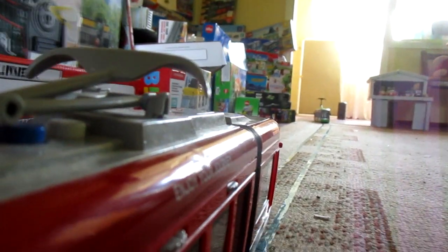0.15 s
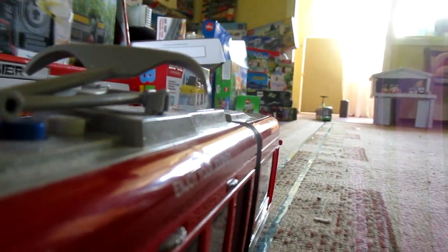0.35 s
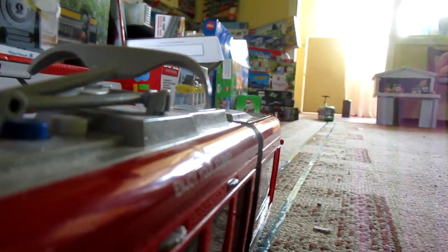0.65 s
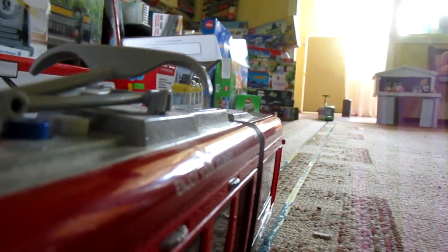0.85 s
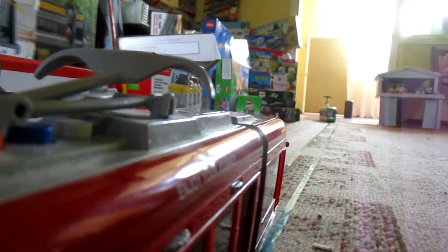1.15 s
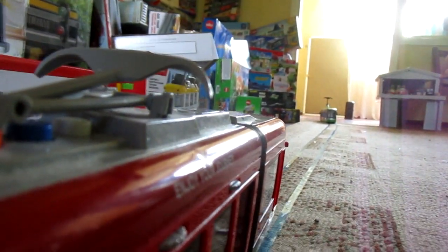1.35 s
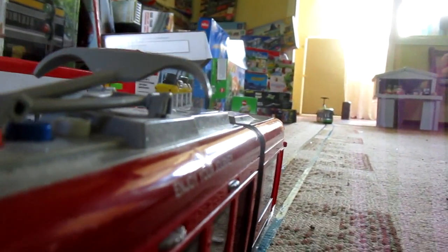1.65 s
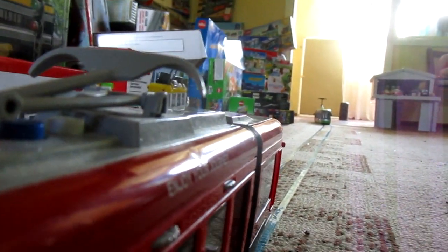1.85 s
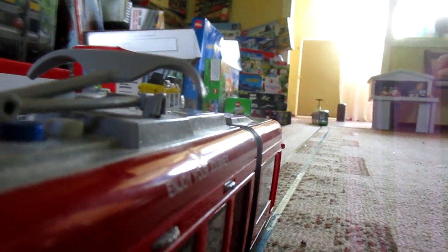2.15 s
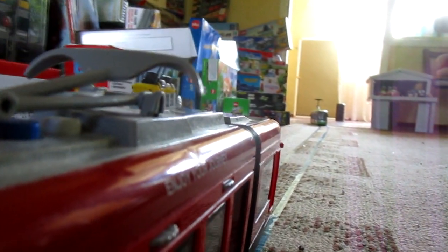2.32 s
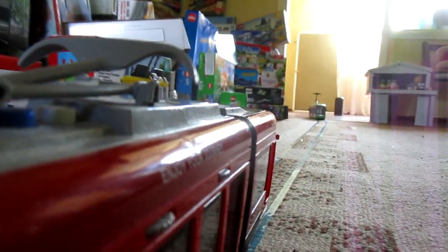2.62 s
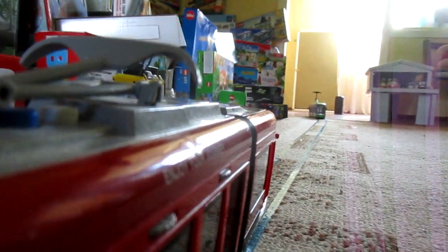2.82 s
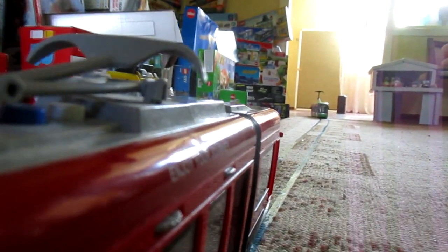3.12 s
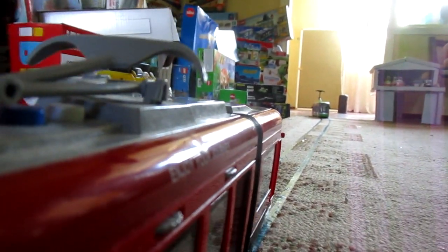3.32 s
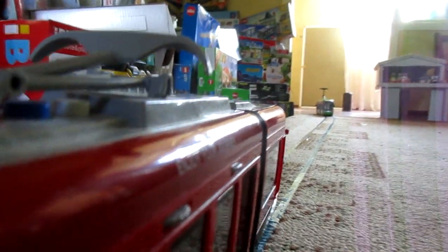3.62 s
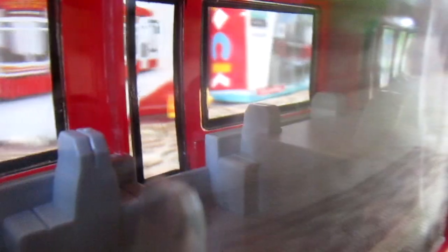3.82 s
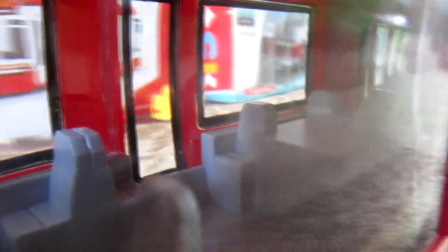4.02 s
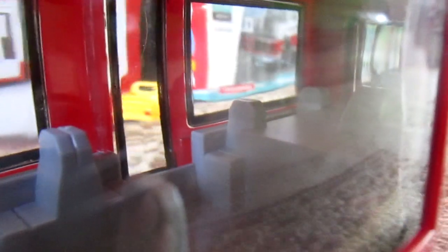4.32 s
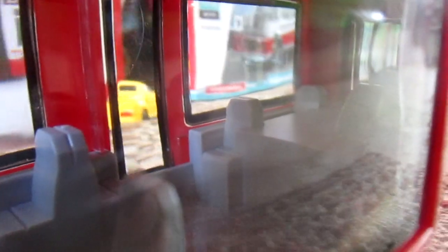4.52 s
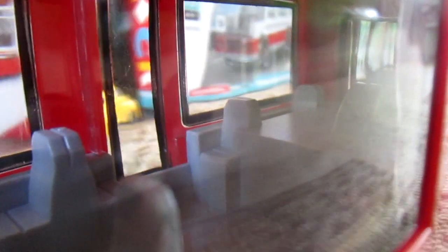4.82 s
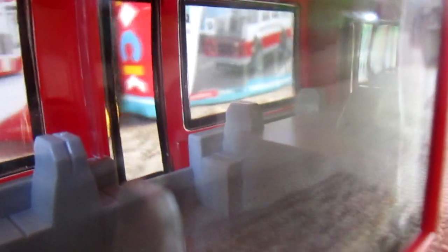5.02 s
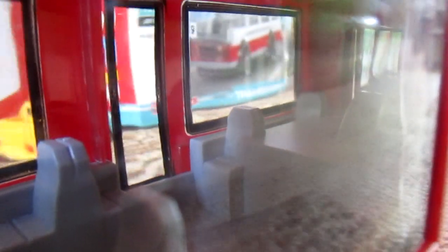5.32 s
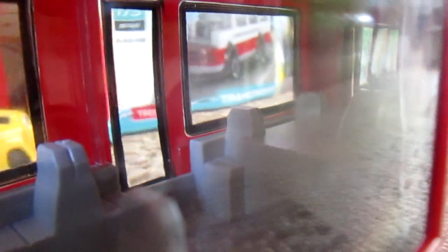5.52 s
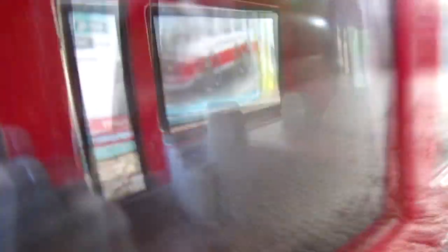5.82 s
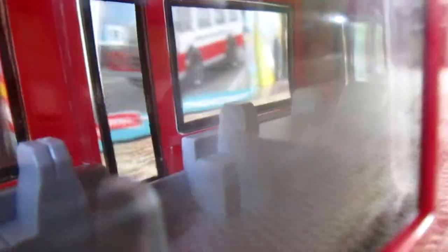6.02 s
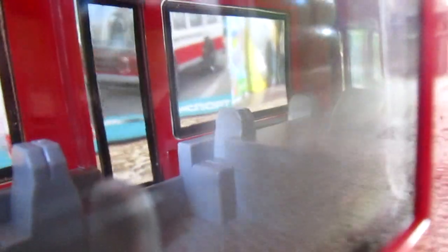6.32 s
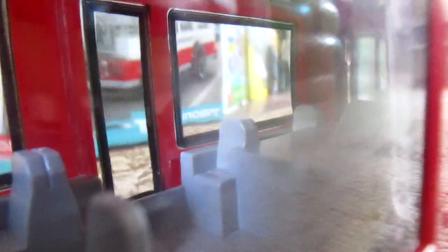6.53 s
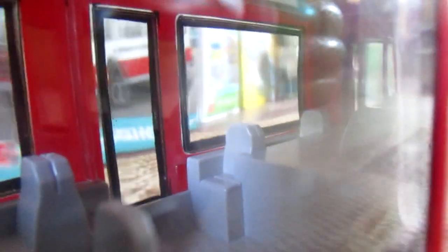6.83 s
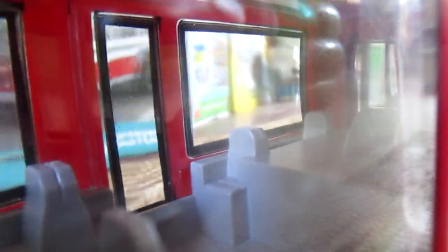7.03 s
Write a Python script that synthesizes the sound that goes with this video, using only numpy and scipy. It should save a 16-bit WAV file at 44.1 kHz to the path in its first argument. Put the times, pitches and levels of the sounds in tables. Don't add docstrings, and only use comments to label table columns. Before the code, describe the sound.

Close, dry mono sound from a microphone riding on a hollow plastic toy tram on carpet in a room. From 0 s, fast gear-tooth ticks, about a hundred a second, form a rough buzzing whirr with hissy scraping above and gritty wheel rumble beneath. Hollow knocks cluster before 0.5 s and around 1.3-1.5 s. The speed wavers, then falls after 2.6 s to a slow ratchet, with strong clacks at 2.8 and 3.4 s. At 3.57 s it cuts to complete silence. At 3.93 s a louder, brighter ride starts abruptly with jolts and ticks up to 4.1 s. From 4.45 s it accelerates, the whine climbing. Sharp clicks come at 4.97 and 5.57 s, then a huge clipping thump at 5.73 s briefly dips the rolling. Another heavy bump follows at 5.93 s, a knock and scraping drag near 6.3 s, and scattered ticks over the fastest whirr until 7.16 s.

```python
import sys
import numpy as np
from scipy import signal
from scipy.fft import rfft, irfft, next_fast_len
from scipy.io import wavfile
from scipy.ndimage import uniform_filter1d

SR = 44100
rng = np.random.default_rng(int(sys.argv[2]) if len(sys.argv) > 2 else 0)


def put_to_file(sound):
    columns = np.atleast_2d(sound).T
    safe = np.clip(columns, -1, 1)
    whole_steps = np.round(safe * 32767)
    wavfile.write(sys.argv[1], SR, whole_steps.astype(np.int16))


def linear_from_db(decibels):
    return 10 ** (np.asarray(decibels, float) / 20)


N = 315752

# (start [s], end [s])
SPANS = [
    (0, 3.5705),
    (3.928, 7.16),
]
# (tooth rate [teeth/s], floor rumble [dB], body [dB], gear [dB])
CRUISE = [
    (105.5, -47, -43.5, -50),
    (199, -47, -40.5, -43.5),
]
# (centre [Hz], width [Hz], lift [dB])
CASE_MODES = [
    [(4430, 120, 4), (5400, 60, 3), (5830, 120, 2), (6260, 270, 6.5), (7450, 130, 2.5), (7930, 150, 7.5),
     (8550, 320, 5.5), (9370, 180, 3.5), (10200, 180, 1.5), (10700, 190, 6.5), (12200, 300, 2.5),
     (13500, 500, 4), (14050, 300, 1.5), (14750, 300, 1.2)],
    [(3550, 200, 8), (3800, 250, 7.5), (5700, 220, 4.5), (6053, 222, 8.5), (7000, 120, 5), (7380, 200, 5.5),
     (7880, 105, 7), (8250, 156, 6), (8630, 210, 6), (9430, 220, 6), (10370, 130, 7.5), (10760, 240, 5.5),
     (13750, 500, 3), (15440, 1100, 13.5)],
]


def level(x, db):
    return x * linear_from_db(db) / np.sqrt(np.mean(x ** 2))


def ring(n, hz, width_hz):
    f = np.fft.rfftfreq(n, 1 / SR)
    return 1j * f * width_hz / (hz ** 2 - f ** 2 + 1j * f * width_hz)


def lifts(n, modes):
    return np.prod([1 + (linear_from_db(db) - 1) * ring(n, hz, width) for hz, width, db in modes], axis=0)


def spectrum(n, points):
    hz, db = np.transpose(points)
    return linear_from_db(np.interp(np.log(np.fft.rfftfreq(n, 1 / SR) + 1), np.log(hz), db))


def walk(n, rate):
    hold = int(SR / rate)
    steps = np.repeat(rng.standard_normal(n // hold + 1), hold)
    return 1.09 * uniform_filter1d(steps, hold)[:n]


def add(out, s, x):
    i = int(s * SR)
    out[i:i + len(x)] += x[:len(out) - i]


def teeth(hz, first):
    phase = np.cumsum(hz) / SR - first
    tooth = np.floor(phase).astype(int)
    since = (phase - tooth) / hz
    hit = np.flatnonzero(np.diff(tooth)[:-64]) + 1
    at = hit - since[hit] * SR + 30 + .00003 * SR * rng.standard_normal(len(hit))
    click, whole = np.zeros(len(hz)), at.astype(int)
    click[whole] = 1 - (at - whole)
    click[whole + 1] = at - whole
    return tooth, since, click


def gearbox(k, tooth, since, click, top_db, strength, speed_db):
    panel_hz = [3650, 4400, 5500, 6200, 7250, 8000, 8600, 9550, 10600, 13300, 15000]
    tooth_db = [
        [(-7, -7, -2, 0, -3, -2, -4, -5), (0, -12, -12, -12, -12, -1, 0, 0), (-5, -6, 0, -1, -5, -2, -6, -6),
         (-8, -3, 0, 0, -1, -4, -8, -8), (-6, 0, -8, -7, -3, -4, -8, -8), (-6, -1, -6, -4, -1, 0, -6, -6),
         (-5, 0, -4, -2, 0, -1, -5, -5), (-3, -1, -2, -1, 0, -1, -2, -2), (-4, -2, -2, 0, 0, -1, -1, -2),
         (-6, -5, 0, -1, -3, -3, -7, -6), (-5, -4, -1, 0, -1, -3, -4, -4)],
        [(-5, -6, -6, -5, -2, 0, 0, -3), (0, 0, 0, -3, -4, -4, -4, -4), (-2, -2, -2, 0, -1, 0, -1, -1),
         (-1, -1, -1, 0, -1, -2, -2, -1), (-9, -11, -10, -3, -6, -9, 0, -4), (0, -2, -4, -2, -3, -8, -6, 0),
         (0, -1, -2, -2, -6, -9, -6, 0), (0, -1, -3, -1, 0, 0, -1, -1), (-2, 0, 0, -2, -2, -2, -2, -1),
         (0, -4, -4, -2, -1, 0, -1, -2), (-4, -4, -4, -2, 0, 0, 0, -3)],
    ][k]
    panel_law = [(-.2, .1, .3, .3, .1, 0.36, .3, .2, .1, -.05, -.05),
                 (.3, .1, -0.52, -0.75, -0.15, 0.51, 0.46, .2, .05, .4, .1)][k]
    panel_bend = [(.01, .01, 0.043, 0.015, 0.019, .01, .01, .01, .01, 0.0091, .01),
                  (.05, .01, -.2, -0.16, -0.14, 0.13, 0.17, .05, 0.054, .05, .05)][k]
    # (scrape rise and decay [s], steady rub [dB], scatter between teeth [dB])
    decay, rub_db, scatter_db = [(.0014, -11.5, 1.0), (.0007, -10, 1.5)][k]
    # (frequency [Hz], level [dB per Hz])
    case_colour = [
        [(2600, -39), (3200, -9), (4400, -8), (6500, -6), (8500, -7), (11000, -11), (13000, -18),
         (15800, -19.5)],
        [(2600, -45), (3200, -20.5), (4400, -11.5), (6500, -5.5), (8500, -4), (11000, -11), (12500, -13),
         (15800, -29.5)],
    ][k]
    edge_db = (21, 20)[k]
    runout = 1.8

    n, out = len(tooth), 0
    log_f = np.log(np.fft.rfftfreq(n, 1 / SR) + 1)
    resonance = lifts(n, CASE_MODES[k])
    colour = spectrum(n, case_colour) * resonance
    sharper = resonance ** 1.6
    sharper = sharper / np.sqrt(np.mean(np.abs(sharper) ** 2))
    scrape = since / decay * np.exp(1 - since / decay)
    wake_db = np.outer(panel_law, speed_db) + np.outer(panel_bend, speed_db ** 2)
    for p, row in enumerate(tooth_db):
        scatter = scatter_db * rng.standard_normal(tooth[-1] + 2)[tooth + 1]
        size = strength * linear_from_db(runout * np.array(row)[tooth % 8] + scatter)
        rub = rng.standard_normal(n) * (linear_from_db(rub_db) * (.6 + .4 * size) + .6 * size * scrape)
        push = rfft(rub) + linear_from_db(edge_db) * rfft(size * click) * sharper
        push = push / np.sqrt(np.mean(np.abs(push) ** 2))
        near = np.interp(log_f, np.log(panel_hz), np.arange(len(tooth_db)) == p)
        share = np.sqrt(np.clip(3 * near - 1, 0, 1))
        panel = irfft(push * colour * share, n)
        panel = panel * linear_from_db(wake_db[p] + 1.1 * walk(n, 2.5))
        if panel_hz[p] > 12000:
            panel = panel * linear_from_db(top_db - np.mean(top_db))
        out = out + panel
    return level(out, 0)


def regrip(gear, k, t):
    # (centre [Hz], width [Hz], lift [dB])
    late_modes = [
        [(4500, 130, 2.5), (5350, 60, 3), (5750, 130, 2), (6170, 160, 5.5), (7440, 180, 3.5), (7750, 180, 2.5),
         (8360, 350, 6.5), (9370, 130, 5.5), (9970, 130, 3.5), (10900, 900, 3), (12300, 400, 4),
         (12900, 180, 2), (14170, 300, 3), (15600, 300, 1)],
        [(3480, 170, 10.5), (3750, 260, 8), (5700, 250, 5), (6190, 350, 6.5), (6800, 100, 5), (7390, 110, 6),
         (7800, 110, 7.5), (8220, 66, 8), (8530, 55, 6), (8730, 110, 7.5), (9400, 150, 7.5), (10450, 100, 8),
         (10900, 300, 5.5), (15250, 1200, 13.5)],
    ][k]
    # (from [s], to [s])
    shift_s = [(1.2, 2), (5.7, 6.6)][k]
    n = len(gear)
    change = (lifts(n, late_modes) / lifts(n, CASE_MODES[k])) ** 1.3
    late = np.interp(t, shift_s, [0, 1])
    return gear * (1 - late) + irfft(rfft(gear) * change, n) * late


def gear_whine(k, click, hz):
    n, whine_hz, width_hz = len(hz), 2350, 600
    body = ring(n, whine_hz, width_hz) ** 2 - .5 * ring(n, 1.6 * whine_hz, width_hz) ** 2
    whine = irfft(rfft(click * (hz / 200) ** 1.9) * body, n)
    return level(whine, (-26, -8.5)[k])


def gear_tones(turns, hz):
    multiples = [2, 2.5, 2.625, 3, 5, 6, 7, 8, 10, 12, 14, 15]
    tone_db = [-21, -22, -24, -27, -30, -22, -26, -28, -19, -36, -29, -26]
    tones = 0
    for multiple, db in zip(multiples, tone_db):
        wobble_db = 3.5 * walk(len(hz), 9)
        tones = tones + linear_from_db(db + wobble_db) * np.sin(2 * np.pi * multiple * turns)
    return tones * (hz / CRUISE[1][0]) ** 6.3


def shell_rings(k, tooth, speed_db):
    # (centre [Hz], width [Hz], level [dB re body], gain [dB per dB of speed])
    side_panels = [
        [(2617, 140, -12.5, 1.6), (1330, 110, -20, -0.5), (2370, 90, -12, .6), (2545, 30, -23.5, 1.1)],
        [(568, 45, -8.5, 0.8), (1470, 100, -20, 0.5), (2488, 130, -18, -2)],
    ][k]
    shake_db = [
        [(-6, -1, -8, -8, 0, -7, -10, -8), (0,) * 8, (-2, -8, -4, -4, -9, -7, -2, 0), (0,) * 8],
        [(0,) * 8] * 3,
    ][k]
    n, out = len(tooth), 0
    shake = rng.standard_normal(n)
    for (hz, width, db, law), row in zip(side_panels, shake_db):
        shaken = rfft(shake * linear_from_db(np.array(row)[tooth % 8]))
        panel = irfft(shaken * ring(n, hz, width) ** 2, n)
        out = out + level(panel, db) * linear_from_db(law * speed_db + 1.2 * walk(n, 9.7))
    return out


def wheels(k, n, rumble_db, body_db, speed_db):
    # (frequency [Hz], level [dB per Hz])
    body_colour = [
        [(15, -37.5), (25, -8), (79, -1), (226, -11.5), (294, -7.5), (566, -5), (736, -9.5), (839, -6.5),
         (1020, -11.5), (1390, -5.5), (1650, -11), (2440, -10.5), (2910, -23.5), (3860, -24.5), (4600, -24.5),
         (5980, -55.5), (10100, -120)],
        [(15, -36), (25, -2.5), (143, -2), (343, -7.5), (436, -9), (579, -4), (769, -16.5), (857, -12.5),
         (1240, -12.5), (1450, -5.5), (1720, -15.5), (2500, -15.5), (2970, -25), (3780, -22.5), (4600, -25),
         (5980, -34), (10100, -120)],
    ][k]
    # (centre [Hz], width [Hz], lift [dB])
    body_modes = [(610, 73, 2), (1460, 76, 1), (2370, 83, 2.5), (2630, 160, 6)]
    tilt_db = [0.14, 0.033][k] * speed_db
    f = np.fft.rfftfreq(n, 1 / SR) + 1
    colour = spectrum(n, body_colour) * lifts(n, body_modes)
    bumps = linear_from_db(1.5 * walk(n, 120) + 0.82 * walk(n, 12))
    rumble, body = 0, 0
    for hz in 25 * 2 ** np.arange(0, 7.8, .5):
        share = np.cos(np.pi * np.clip(np.log2(f / hz), -.5, .5))
        band = irfft(rfft(rng.standard_normal(n) * bumps) * colour * share, n)
        flicker_db = 1.5 * walk(n, 6 + hz / 60)
        band = band * linear_from_db(flicker_db + tilt_db * max(np.log2(hz / 586), 0))
        if hz > 350:
            body = body + band
        else:
            rumble = rumble + band
    return level(rumble, 0) * linear_from_db(rumble_db) + level(body, 0) * linear_from_db(body_db)


def loudness(k, t, hz):
    # (rumble, body, gear, top panels [dB per dB of speed])
    speed_law = [(0.198, .6, 0.21, -.55), (.3, 0.907, 0.87, -0.048)][k]
    # (time [s], level [dB])
    hand_press = [
        [(0, -1.5), (.1, .4), (.2, -0.5), (.45, 0), (1.1, 0), (1.4, 0), (1.8, 1.5), (2.55, 0.5), (2.9, -.5),
         (3.57, 2.5)],
        [(3.93, -1.5), (4.05, 0.5), (4.35, -2), (5, 1.5), (5.3, 0.5), (5.7, 1.5), (6.1, -1), (6.4, 0.5),
         (7.16, 1.5)],
    ][k]
    press_share = (0.95, 0.55, 0.77, -.8)
    cruise_hz, *cruise_db = CRUISE[k]
    speed_db = 20 * np.log10(hz / cruise_hz)
    press_db = np.interp(t, *np.transpose(hand_press))
    after = np.maximum(t - 5.74, 0)
    duck_db = -10.5 * (1 - np.exp(-after / 0.034)) * np.exp(-after / 0.11)
    *moves, top = [law * speed_db + share * press_db for law, share in zip(speed_law, press_share)]
    return [db + move + duck_db for db, move in zip(cruise_db, moves)] + [top]


def ride(k):
    # (time [s], tooth rate [teeth/s])
    speed_roof = [(0.0, 116.2), (0.93, 97.9), (1.393, 110.9), (1.903, 91.8), (2.61, 91.9), (3.255, 49.3),
                  (3.57, 41.6)]
    # (time [s], tooth rate [teeth/s])
    speed_side = [(3.93, 128.2), (4.448, 126.1), (5.099, 181.9), (5.299, 191.3), (5.793, 191.4),
                  (6.337, 223.0), (6.39, 231.9), (6.601, 228.8), (6.706, 242.1), (6.84, 246.8),
                  (7.16, 245.8)]
    first_tooth = [-.04, .81][k]
    start, end = SPANS[k]
    n = next_fast_len(min(N, int(end * SR)) - int(start * SR))
    t = int(start * SR) / SR + np.arange(n) / SR
    hz = np.interp(t, *np.transpose((speed_roof, speed_side)[k]))
    speed_db = 20 * np.log10(hz / CRUISE[k][0])
    rumble_db, body_db, gear_db, top_db = loudness(k, t, hz)

    tooth, since, click = teeth(hz, first_tooth)
    strength = np.minimum(hz / 90, 1)
    gear = regrip(gearbox(k, tooth, since, click, top_db, strength, speed_db), k, t)
    singing = gear_whine(k, click, hz) + gear_tones(tooth + since * hz, hz)
    singing = singing + shell_rings(k, tooth, speed_db)
    sound = gear * linear_from_db(gear_db) + singing * linear_from_db(body_db)
    sound = sound + wheels(k, n, rumble_db, body_db, speed_db)
    return sound * np.clip((end - t) / 0.0016, 0, 1) * np.clip((t - t[0]) / 0.00087, 0, 1)


def clack(db, hz, t60, spread, rough, wide):
    t = np.arange(2048) / SR
    chance, crackle = rng.random((2, 5)), rng.standard_normal(2048)
    fall = np.exp(-np.log(1000) * t / max(t60, .003)) * (1 - np.exp(-t * hz * 1.6))
    pitches = hz * np.exp(spread * (chance[0] - .5) * [0.088, 2.2, 1.4, 1.7, 1.1])
    strengths = chance[1] - [-1.08, 0.58, 1.0, 0.663, 0.48]
    tones = np.sum(np.sin(2 * np.pi * pitches[:, None] * t) * strengths[:, None], axis=0)
    burst = irfft(rfft(crackle * fall ** 2) * ring(2048, hz, wide * hz) ** 3)
    x = tones * fall + rough * burst / np.max(np.abs(burst))
    return linear_from_db(db) * x / np.max(np.abs(x))


def knocks(out):
    # (time [s], upper ring [Hz], upper level [dB], hollow level [dB])
    knocks_roof = [(.133, 2090, -26, -38), (.153, 2000, -45, -26), (.2385, 2100, -32.5, -44),
                   (.239, 1400, -31, -50), (.276, 1400, -36, -50), (.358, 1220, -28, -31),
                   (.407, 1510, -34, -41), (.444, 1260, -33, -38), (.493, 1500, -32, -38),
                   (.96, 1280, -34, -56), (1.297, 1330, -31, -38.5), (1.393, 1380, -28, -51),
                   (1.405, 2440, -33, -34), (1.417, 1310, -33, -44), (1.473, 1350, -37, -54),
                   (1.816, 1184, -28, -32), (1.965, 1380, -30.5, -32.5), (2.03, 1290, -38, -37.5),
                   (2.224, 2030, -36, -34.5), (2.501, 1370, -32, -37), (2.537, 1153, -29, -32.5),
                   (2.8106, 1256, -15.5, -23.5), (2.8112, 1740, -20, -35.5), (3.057, 1690, -34, -41.5),
                   (3.109, 1180, -34, -39), (3.143, 1180, -32, -36), (3.142, 1650, -31, -50),
                   (3.173, 1080, -36.5, -39), (3.2334, 1534, -30.5, -42), (3.2334, 1160, -32.5, -48),
                   (3.392, 1500, -36, -47), (3.4031, 1620, -21.5, -30.5), (3.403, 1210, -27, -50)]
    # (time [s], upper ring [Hz], upper level [dB], hollow level [dB])
    knocks_side = [(3.935, 1410, -25, -39), (4.007, 1160, -47, -36), (4.061, 1200, -29, -40),
                   (4.081, 1700, -26.5, -21.5), (4.419, 1036, -31, -42), (4.547, 1080, -30, -39.5),
                   (4.604, 1480, -42, -35.5), (4.974, 1650, -30, -36), (4.976, 1050, -30, -50),
                   (4.998, 1460, -36, -32), (5.038, 900, -45, -32.5), (5.055, 910, -32.5, -38),
                   (5.325, 1470, -34, -36), (5.399, 1070, -34, -43), (5.425, 1240, -30.5, -46),
                   (5.734, 1606, -17, -14), (5.738, 2020, -27, -33), (5.813, 1400, -45, -31.5),
                   (5.899, 900, -49, -43), (5.933, 2100, -21, -27), (5.935, 950, -22.5, -25.5),
                   (5.963, 2510, -29, -39), (6.293, 1410, -24.5, -28), (6.373, 1220, -27, -38),
                   (6.607, 1350, -43, -29.5), (6.863, 1505, -23, -35), (6.875, 1310, -32, -35),
                   (7.072, 1480, -37, -50), (7.089, 1880, -29.5, -40)]
    t60 = 0.04
    for s, hz, upper_db, hollow_db in knocks_roof + knocks_side:
        hollow_hz = 586 * linear_from_db(-0.11 * max(hollow_db + 28.5, 0))
        add(out, s + .0007, clack(upper_db + 1, hz, t60, .4, 2.9, 0.85))
        add(out, s + 0.00066, clack(hollow_db + 2, hollow_hz, 1.03 * t60, 0.079, 1.0, 0.97))


def small_ticks(out):
    # (time [s], peak [dB], ring [Hz], time to fall 60 dB [s], crackle width [re ring])
    tick_table = [(0.5791, -35, 7920, 0.015, 2.2), (2.339, -29, 7000, 0.013, 2),
                  (2.339, -33, 12500, .01, 1), (2.8111, -25, 3450, 0.02, 1.94),
                  (4.0597, -26.5, 11100, 0.017, 2.3), (4.0603, -29, 3600, .015, 1.2),
                  (4.0806, -19, 3530, 0.019, 4), (4.1697, -30, 6030, 0.02, 1), (4.1695, -33, 3920, .02, .4),
                  (4.9733, -17, 9900, 0.015, 2.9), (4.9735, -29, 3460, 0.037, 0.31),
                  (1.6092, -38, 3600, .02, .8), (1.8163, -36, 3360, .02, .8),
                  (2.5017, -38.5, 3300, .02, .8), (1.3029, -41, 3050, .02, .6), (.1326, -40, 3370, .02, .5),
                  (5.5699, -23, 3770, 0.014, 0.95), (5.5699, -21, 7540, 0.016, .6),
                  (5.57, -26, 9600, .014, .3), (5.7328, -2, 6600, 0.0053, 3.7),
                  (5.7335, -12, 3600, .012, 1.8), (5.7352, -12, 3640, 0.027, 1),
                  (5.7342, -13, 7500, .02, 2.5), (5.7375, -17, 6000, .012, 2.5),
                  (5.9344, -19, 3480, 0.033, 2.5), (5.943, -27, 3470, 0.018, 2.5),
                  (5.9622, -18.5, 11000, 0.015, 2.9), (6.265, -25.5, 3520, 0.016, 1.5),
                  (6.265, -25, 8000, .014, .7), (6.2862, -24, 3750, 0.021, 2.7),
                  (6.3013, -23, 6620, 0.05, 1), (6.3729, -20, 11300, 0.015, 1.4),
                  (6.6556, -25, 3800, 0.015, 1.5), (6.6553, -27, 11400, .015, .5),
                  (6.7605, -21.5, 3800, 0.014, 3), (6.7605, -24, 11400, .015, .4),
                  (7.0893, -27, 11100, 0.015, .7)]
    for s, db, hz, t60, wide in tick_table:
        add(out, s + 0.00094, clack(db, hz, t60, 0.2, 4.0, wide))


def scrapes(out):
    # (time [s], length [s], level [dB], centre [Hz])
    scrape_table = [
        (5.695, 0.04, -25, 2200),
        (6.29, 0.043, -26, 5000),
        (6.325, 0.12, -30, 3900),
        (6.335, 0.105, -33, 8000),
        (1.2, 0.028, -31, 1000),
    ]
    n = 8192
    t = np.arange(n) / SR
    for s, length, db, hz in scrape_table:
        shape = np.clip(t / 0.0077, 0, 1) * np.clip(1 - t / length, 0, 1) ** 0.18
        rub = rng.standard_normal(n) * linear_from_db(1.2 * walk(n, 167)) * shape
        add(out, s, linear_from_db(db) * irfft(rfft(rub) * ring(n, hz, 1.5 * hz) ** 2))


def jolts(out):
    # (time [s], peak [dB], swing [Hz], time to fall 60 dB [s], direction [+1 or -1])
    jolt_table = [(1.392, -31.5, 626, 0.15, 1), (3.938, -31.5, 114, 0.051, 1), (3.96, -29, 100, 0.044, -1),
                  (4.082, -15.5, 202, 0.013, -1), (4.09, -25, 70, .06, -1), (5.409, -33, 240, 0.1, 1),
                  (5.708, -26, 352, 0.049, 1), (6.3, -29, 90, .1, 1), (6.415, -32, 330, .05, 1),
                  (6.44, -32.5, 330, 0.064, 1), (5.27, -32, 302, .06, 1), (4.009, -23.5, 197, 0.013, 1),
                  (4.048, -23, 266, 0.02, 1), (4.079, -13, 225, 0.0058, 1), (5.7346, 3.5, 273, 0.011, 1),
                  (5.7359, -4, 210, .012, -1), (4.96, -25, 450, 0.014, 1), (5.9005, -14, 420, 0.0068, 1),
                  (5.9358, -1.5, 169, 0.0087, 1), (5.938, -16.5, 44.6, 0.086, -1),
                  (6.2901, -7.5, 303, 0.0088, -1), (6.874, -19, 250, 0.0074, 1)]
    t = np.arange(4096) / SR
    for s, db, hz, t60, direction in jolt_table:
        swing = np.sin(2 * np.pi * hz * t) * np.exp(-np.log(1000) * t / t60)
        add(out, s, np.sign(direction) * linear_from_db(db) * swing)


def scene():
    out = np.zeros(N)
    for k in range(2):
        add(out, SPANS[k][0], ride(k))
    knocks(out)
    small_ticks(out)
    scrapes(out)
    jolts(out)
    return out[None]


def roll_off(x):
    return signal.sosfilt(signal.butter(12, 16460, fs=SR, output="sos"), x)


def record(dry):
    n = next_fast_len(N)
    port = 1 - (1 - 0.13) * ring(n, 4800, 1150)
    x = irfft(rfft(dry, n) * port, n)[:, :N]
    top_cut = signal.ellip(10, .3, 60, 15740, fs=SR, output="sos")
    x = signal.sosfilt(top_cut, np.clip(x, -.99, .99))
    t = np.arange(N) / SR
    riding = (t < SPANS[0][1]) | (t > SPANS[1][0])
    return roll_off(x * riding)


dry = scene()
out = record(dry)
put_to_file(out)
```